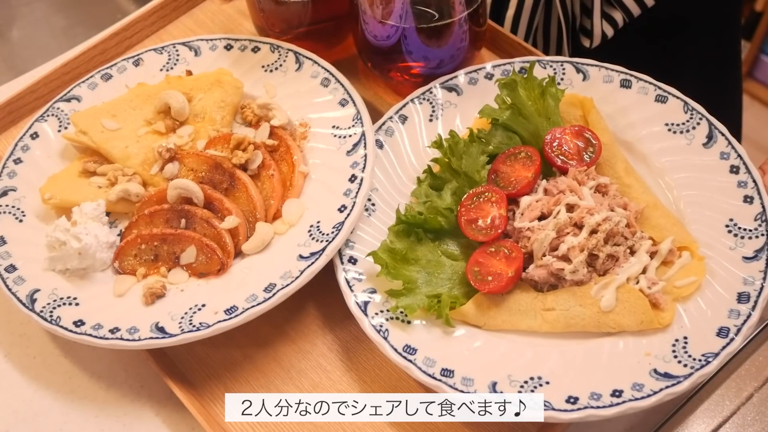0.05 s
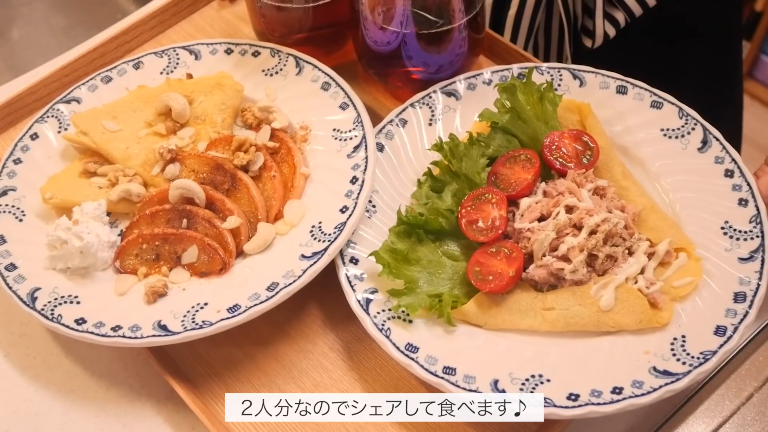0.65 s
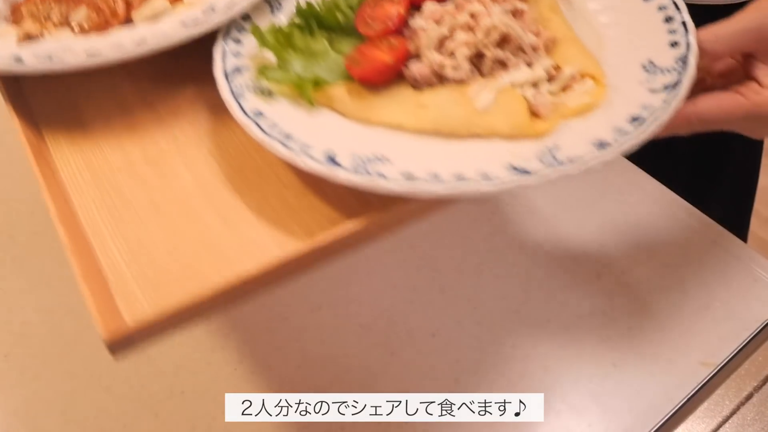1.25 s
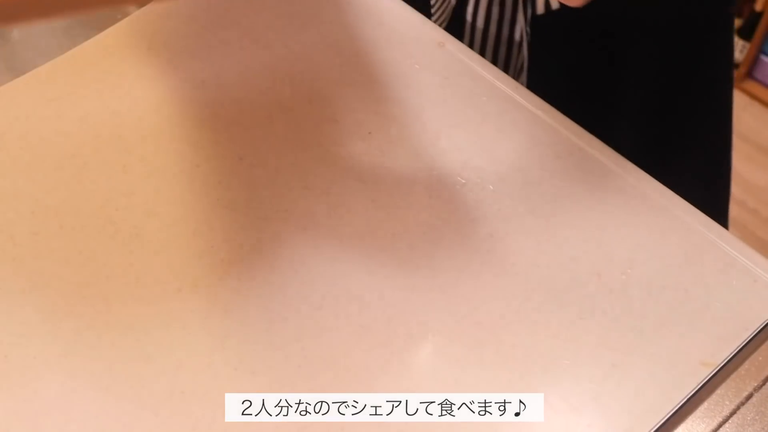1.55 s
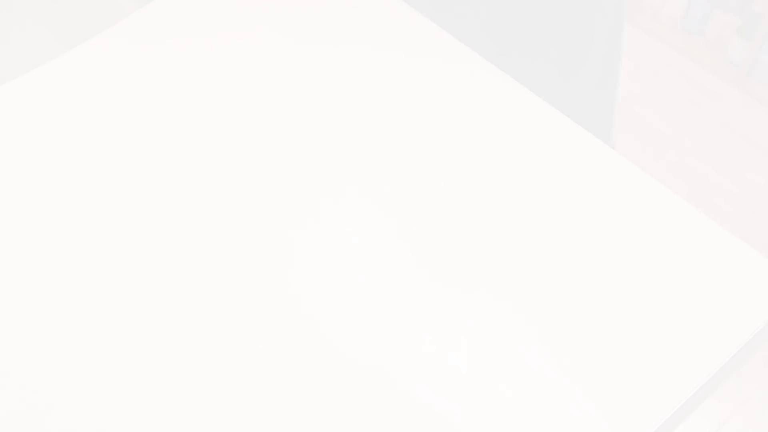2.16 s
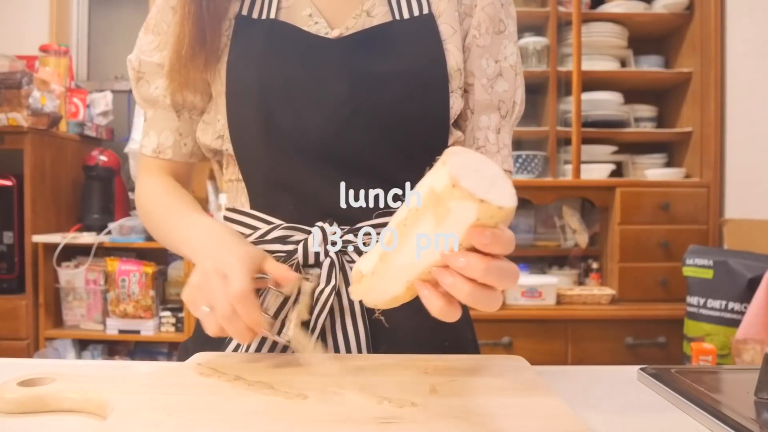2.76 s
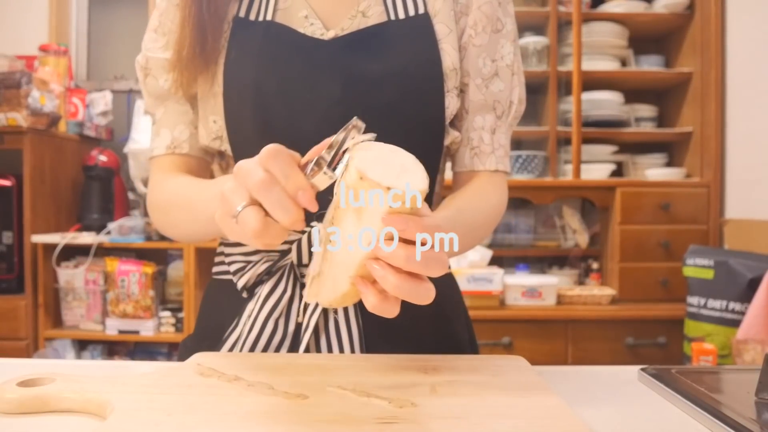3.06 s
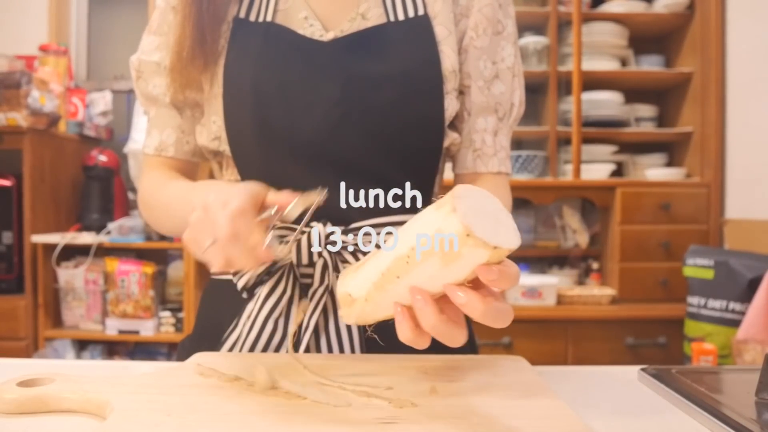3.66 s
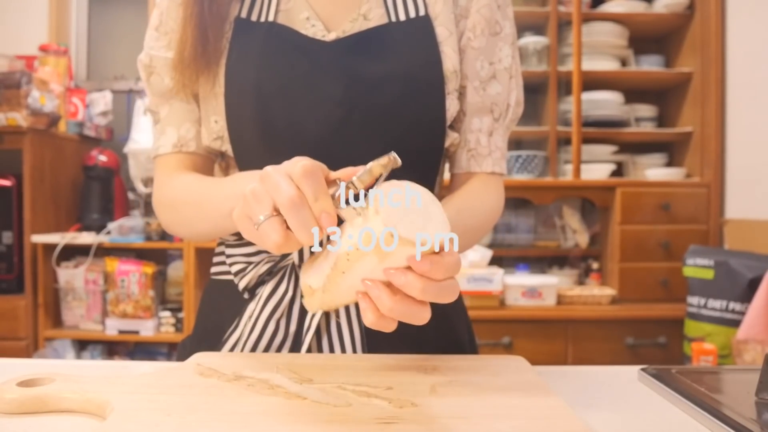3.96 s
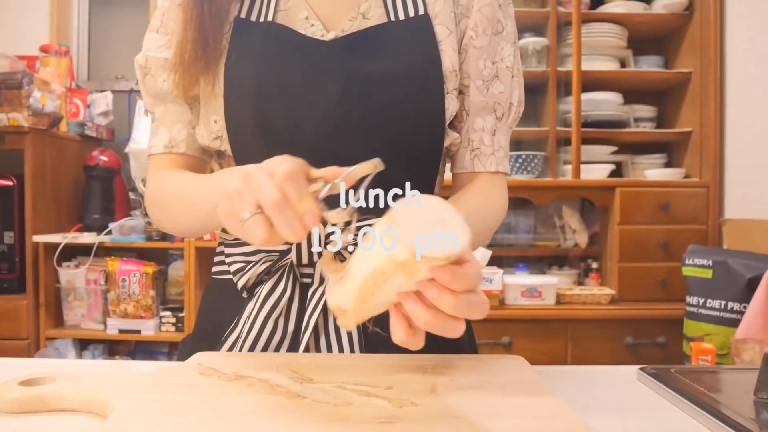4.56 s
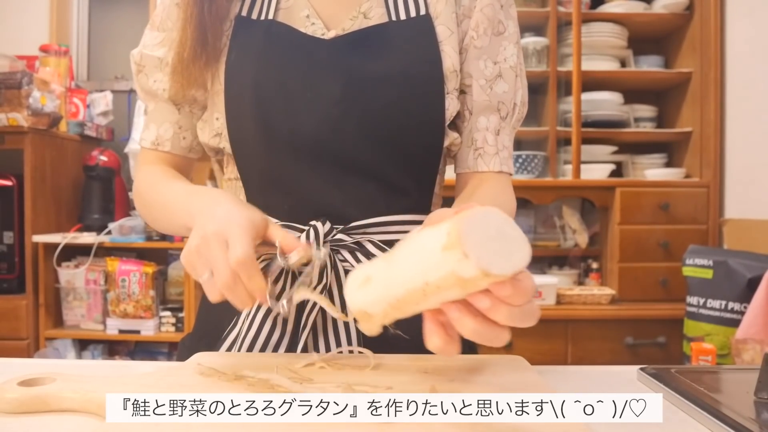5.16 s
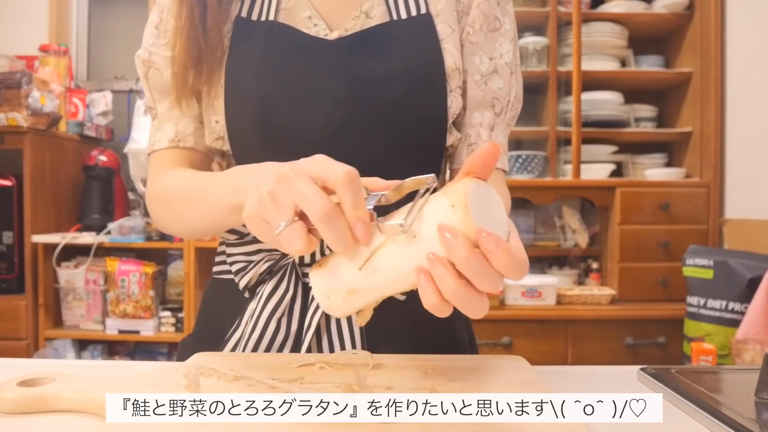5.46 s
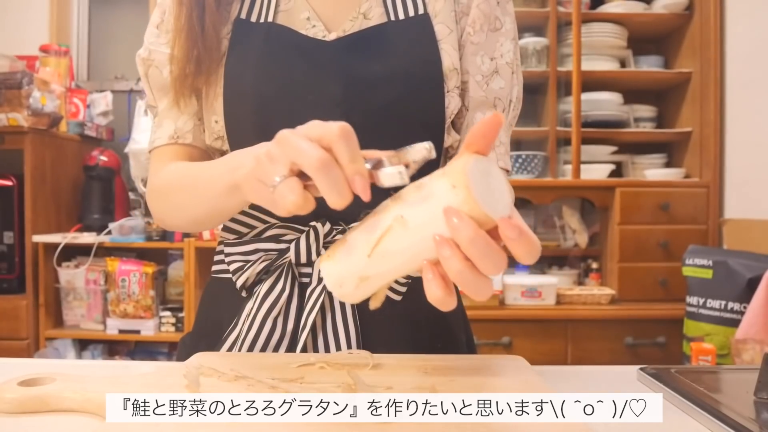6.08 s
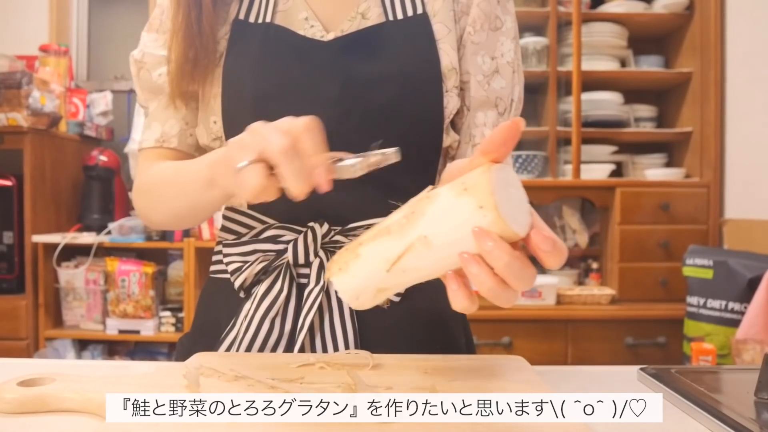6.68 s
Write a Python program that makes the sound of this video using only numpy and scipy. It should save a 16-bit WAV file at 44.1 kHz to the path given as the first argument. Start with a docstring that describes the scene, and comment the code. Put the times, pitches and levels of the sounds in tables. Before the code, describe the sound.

A swivel peeler scrapes a root vegetable six times in a small kitchen, its loose steel blade clinking between the short, moist rasps. Before it starts, there is only a low appliance hum with fan hiss and the faint rustle of a tray being lifted. A sharp double click, very close and louder than everything else, cuts across the first stroke. The hum carries on beneath the peeling to the end.

```python
"""Peeling a yam

A metal swivel peeler makes six quick strokes in a small kitchen with humming appliances. In each, the
blade lands (impact), rasps through skin and wet flesh (fracture), then slips off and rattles against its
stop (free vibration). First a tray is lifted from the worktop with a faint rustle; then the background
hum and hiss change at a scene cut, and the peeling begins. During the first stroke a sharp double click,
like a switch pressed and released, sounds very close."""
import sys
import numpy as np
from scipy import signal
from scipy.fft import rfft, irfft
from scipy.io import wavfile

SR = 44100
rng = np.random.default_rng(int(sys.argv[2]) if len(sys.argv) > 2 else 0)


def store_pcm(level_fs):
    """Save levels as 16-bit WAV."""
    pcm = np.round(np.clip(level_fs, -1, 1) * 32767).astype(np.int16)
    wavfile.write(sys.argv[1], SR, np.atleast_2d(pcm).T)


N = 305172
TIME = np.arange(N) / SR

# Levels are in dB; the click, smacks, blade hits and peeling add a further gain.
# fan noise before and after the scene cut (frequency [Hz], spectral level [dB])
FAN_BEFORE = [(25,-18), (60,-8.5), (140,-10.5), (400,-9), (520,-10), (700,-13), (1200,-17), (2500,-28),
              (5500,-26), (6600,-24), (9000,-29), (12500,-28), (15000,-24.5)]
FAN_AFTER = [(25,-20), (60,-10.5), (170,-6), (330,-5.5), (520,-9), (700,-13), (1200,-16.5), (2500,-27.5),
             (3200,-24), (6400,-24), (9000,-26), (12500,-25), (15000,-21.5)]
# likeness of the fan noise on left and right (frequency [Hz], coherence [0-1])
FAN_COHERENCE = [(50, 0.98), (300, 0.99), (1500, 0.93), (7000, 0.84), (15000, 0.92)]
# motor tones (frequency [Hz], level before [dB], level after [dB], wavering share of power [0-1])
MOTOR_TONES = [(49, -53.5, -56.5, 0.02), (95.9, -55, -72, 0), (99.8, -59, -55, 0.7),
               (198.2, -60, -55.5, 0.77), (204.1, -55, -56.5, 0.35), (241.7, -64.5, -57.5, 0.74),
               (295.4, -60.5, -74, 0.6), (340.3, -76, -66.5, 0.8), (385.7, -61, -62, 0.56),
               (484.8, -54.5, -58, 0.32)]

# the tray is lifted, later a strip of peel drops (time [s], level [dB], rise [s], decay [s])
HANDLING_CONTACTS = [(.65, -55.5, .015, 0.033), (1.4, -53, .04, .05), (2.852, -44, .002, .007)]
# the double click (time [s], level [dB], rise [s], decay [s])
SWITCH_CLICKS = [(2.5302, 1.5, 0.000076, 0.003), (2.6812, -2.5, 0.00036, 0.0037)]
# slimy peel sticks and lets go (time [s], level [dB])
PEEL_SMACKS = [(5.4655, -23.5), (5.871, -31), (5.889, -35), (5.9085, -36), (6.2823, -29), (6.3181, -31),
               (6.408, -15), (6.782, -38), (6.8177, -34)]
# the edge sticks and slips (time [s], level [dB], rise [s], decay [s])
EDGE_SQUEAKS = [(3.138, -38, .003, 0.0073), (3.186, -33.5, 0.0043, .008), (6.465, -35.5, 0.045, .02)]
# the blade skids before it bites (time [s], level [dB], rise [s], decay [s])
BLADE_SKIDS = [(5.53, -33.5, 0.014, .08)]
# the freed blade hits its stop (time [s], level [dB], rise [s])
BLADE_SWINGS = [(2.7501, -11, 0.0041), (2.768, -12.5, 0.0024), (2.921, -19, 0.0022), (2.998, -32, .004),
                (3.5965, -18.5, 0.00043), (3.64, -29.5, 0.002), (4.41, -21, 0.0014), (5.1085, -10, 0.0015),
                (5.1244, -16, 0.0028), (5.177, -23.5, 0.00083), (5.411, -34.5, 0.0015),
                (5.7975, -12, 0.0023), (5.8474, -29, 0.0028), (6.5795, -11.5, .002)]
# the blade lands or snags on the yam (time [s], edge level [dB], knock level [dB], rise [s])
BLADE_LANDINGS = [(2.492, -22.5, -47, .001), (3.1338, -29.5, -62, 0.00076), (3.1917, -11.5, -40.5, .003),
                  (3.2915, -11.5, -42, 0.00021), (3.468, -16, -56, .0006), (3.974, -11.5, -41.5, .0024),
                  (4.0815, -11.5, -40, 0.00039), (4.2355, -7, -36, .0007), (4.734, -33, -56, 0.0067),
                  (4.772, -10.5, -48.5, 0.008), (4.8795, -19.5, -54, 0.007), (5.2935, -18.5, -57, .005),
                  (5.31, -17.5, -65, .008), (5.779, -15, -39, .002), (6.0123, -35, -60, .001),
                  (6.1992, -7.5, -32, 0.0027), (6.246, -24, -49, 0.0019)]
# strokes (touch [s], bite [s], deepest cut [s], exit [s],
# crackle level [dB], rasp level [dB], tearing level [dB], chatter level [dB], tearing pitch [Hz])
PEELING_STROKES = [ (2.49, 2.53, 2.68, 2.767, -32, -59, -54, -53, 1820),
                   (3.215, 3.29, 3.39, 3.511, -32.5, -42, -44.5, -45, 1760),
                   (3.98, 4.11, 4.22, 4.31, -32.5, -43, -45, -51, 1770),
                   (4.79, 4.915, 5.04, 5.124, -34, -44.6, -44.5, -47.5, 1770),
                   (5.495, 5.585, 5.72, 5.775, -32, -48, -52.5, -43.5, 1860),
                   (6.295, 6.36, 6.45, 6.536, -31.5, -44.3, -52, -46.5, 1930), ]
# loss at the shallowest cut (crackle [dB], rasp [dB], tearing [dB], chatter [dB])
SHALLOW_CUT_LOSS = [2.65, 4.8, 13.6, 6.1]

# normal modes (frequency [Hz], level [dB], time to fall 60 dB [s])
HOUSING_MODES = [(104, -25, 0.022), (176, -21.5, 0.049), (537, -18.5, 0.018), (763, -16.5, 0.029),
                 (1054, -19.5, 0.023)]  # hollow body under the double click
BLADE_MODES = [(4600, -20, .05), (5750, -21, .05), (7450, -19, .1), (10050, -20, .09), (11110, -21, .1),
               (12980, -1, .07), (13070, 2, .1), (13640, -9, .045), (13870, -10, .04), (14650, -10, .05),
               (15270, -13, .06), (15600, -12, .07)]  # steel blade

# spectral envelopes (frequency [Hz], spectral level [dB])
RUSTLE_SPECTRUM = [(400, -15), (1100, 0), (1700, -10), (3000, -17), (8000, -28)]  # soft handling
SNAP_SPECTRUM = [(900,-21), (2000,-13), (3000,-5.5), (4760,-6), (5750,-3), (7620,-5.5), (10500,0),
                 (12200,0.5), (13500,-3.5), (16000,-4.5)]  # double click
SMACK_SPECTRUM = [(2000,-27), (4000,-13), (9500,-17), (11800,5), (13000,-4), (15500,-10)]  # bursting slime
FRAME_SPECTRUM = [(2000, -75), (3500, -8), (4700, 5.5), (5200, -1), (5800, 5.5), (6700, -14), (9000, -27)]  # jolted peeler frame
CLINK_SPECTRUM = [(5500, -21.5), (7500, -9.5), (9000, -9), (12300, -3), (13000, 7), (14000, 3), (15700, -7),
                  (17000, -53)]  # blade on its stop
TICK_SPECTRUM = [(2060, -30), (3500, -19), (4540, -13), (5970, -10), (6870, -19.5), (7600, -6), (8800, -15),
                 (9200, -8.5), (12000, -9), (12600, -4), (13400, 1.5), (13700, -1), (16000, -6)]  # edge meeting the yam
KNOCK_SPECTRUM = [(470, -54), (800, -17), (966, -1), (1140, -7), (1280, 9), (1450, -3.5), (1950, -2.5),
                  (2170, 4), (2480, -5), (2720, 7.5), (4000, -12), (5200, -69), (8800, -120)]  # dull part of a landing
SKIN_SPECTRUM = [(4500,-13), (6500,-10), (7750,-2.5), (8400,-7), (10000,-4.5), (12000,-3), (12650,-4),
                 (13100,-4), (13700,3.5), (15100,2), (16000,-23)]  # fine crackle of the skin
RASP_SPECTRUM = [(750,-19), (1100,-9.5), (2300,-10), (2760,-0.5), (3100,-13), (4200,-6), (4900,4), (5640,2),
                 (6600,2.5), (8500,-14), (11000,-26)]  # coarse scraping
CHATTER_SPECTRUM = [(2300,-30), (3000,-8.5), (3400,-1), (3550,-1.5), (3850,-4), (4500,-9.5), (5500,-41)]  # blade vibrating in the cut


def from_db(db):
    """The decibel scale is logarithmic: 20 dB is a tenfold amplitude."""
    return 10 ** (np.asarray(db) / 20)


def rms_one(x):
    """Normalisation to unit mean power."""
    return x / np.sqrt(np.mean(x ** 2) + 1e-20)


def at_hz(points, hz):
    """Interpolation on a logarithmic frequency axis."""
    frequencies, values = np.transpose(points)
    return np.interp(np.log(hz + 1), np.log(frequencies), values)


def drift(rate_hz):
    """Random modulation: straight lines between Gaussian values; rms 1."""
    knots = rng.standard_normal(N // 40)
    return rms_one(np.interp(TIME * rate_hz, np.arange(len(knots)), knots))


def through(x, response):
    """Convolution: a linear system answers each sample with its impulse response."""
    return signal.oaconvolve(x, response)[:N]


def colour(x, spectrum, size=2048):
    """Minimum-phase filtering: a folded cepstrum gives a causal response of unit energy."""
    gain = from_db(at_hz(spectrum, np.fft.rfftfreq(size, 1 / SR)))
    cepstrum = irfft(np.log(gain))
    cepstrum[1:size // 2] *= 2
    cepstrum[size // 2 + 1:] = 0
    response = irfft(np.exp(rfft(cepstrum)))
    return through(x, response / np.linalg.norm(response))


def resonance(force, hz, width_hz):
    """Forced resonance in two stages, with a pitch that may move; about unit energy."""
    carrier = np.exp(2j * np.pi * np.cumsum(hz) / SR)
    r = np.exp(-np.pi * width_hz / SR)
    envelope = signal.lfilter([1], [1, -2 * r, r * r], force / carrier + 1e-18)
    return (carrier * envelope).real * np.sqrt(8 * (1 - r) ** 3)


def grains(per_s, spread_db):
    """Shot noise: tiny impulses of uneven size at random moments; rms 1."""
    out = np.zeros(N)
    at = np.flatnonzero(rng.random(N) < per_s / SR)
    sizes = from_db(spread_db * np.minimum(rng.exponential(1, len(at)), 4))
    out[at] = sizes * rng.choice([-1, 1], len(at))
    return rms_one(out)


def contacts(rows, spread_db):
    """Rough contact: micro-impacts build up and die exponentially; one force per level column."""
    forces = np.zeros((len(rows[0]) - 3, N))
    for time, *levels_db, rise, decay in rows:
        near = np.flatnonzero(np.abs(TIME - time) < .1)
        t = TIME[near] - time
        burst = np.exp(np.where(t < 0, t / rise, -t / decay))
        forces[:, near] += np.outer(from_db(levels_db), burst)
    return [force * grains(14000, spread_db) for force in forces]


def strikes(rows):
    """Impulse approximation: the main impact of each contact lasts one sample."""
    impulses = np.zeros(N)
    for time, db, *_ in rows:
        impulses[round(time * SR)] = from_db(db)
    return impulses


def fan(spectrum, level_db):
    """Partial coherence: steady fan noise, nearly alike on both sides in the bass."""
    hz = np.fft.rfftfreq(N, 1 / SR)
    coherence = at_hz(FAN_COHERENCE, hz)
    mid, side = rfft(rng.standard_normal((2, N))) * from_db(at_hz(spectrum, hz))
    stereo = np.sqrt(1 + coherence) * mid + np.sqrt(1 - coherence) * side * [[1], [-1]]
    return from_db(level_db) * rms_one(irfft(stereo, N))


def hum(after, waver_hz):
    """Quadrature modulation: motor tones waver in amplitude and phase."""
    out = np.zeros(N)
    for hz, before_db, after_db, share in MOTOR_TONES:
        phase = 2 * np.pi * hz * TIME
        steady = np.sqrt(2 * (1 - share)) * np.sin(phase)
        wavering = drift(waver_hz) * np.sin(phase) + drift(waver_hz) * np.cos(phase)
        out += from_db(before_db + after * (after_db - before_db)) * (steady + np.sqrt(share) * wavering)
    return out


def appliances(scene_cut_s, whine_hz, whine_width_hz, whine_db):
    """Superposition: the background hum and hiss change at a scene cut, where a thin whine stops."""
    after = np.clip((TIME - scene_cut_s) / 0.35 + .5, 0, 1)
    whine_band = signal.iirpeak(whine_hz, whine_hz / whine_width_hz, fs=SR)
    whine = rms_one(signal.lfilter(*whine_band, rng.standard_normal(N)))
    early = fan(FAN_BEFORE, level_db=-47) + from_db(whine_db) * whine
    late = fan(FAN_AFTER, level_db=-47)
    sound = np.sqrt(1 - after) * early + np.sqrt(after) * late + hum(after, waver_hz=9)
    swell_db = np.interp(TIME, [0, 0.86], [-1, 0]) + 1.5 * after
    return sound * from_db(swell_db)


def kitchen(x, t60_s, reverb_db, width):
    """Reverberation: dense reflections from worktop and cupboards decay exponentially."""
    t = TIME[:SR // 2]
    tails = rng.standard_normal((2, len(t))) * from_db(-60 * t / t60_s) * (t > .003)
    mid, side = (through(x, tail / np.linalg.norm(tail)) for tail in tails)
    return x + from_db(reverb_db) * (mid + width * side * np.array([[1], [-1]]))


def handling():
    """Friction noise: the lifted tray and a dropped strip of peel give a faint, dull rustle."""
    brush, = contacts(HANDLING_CONTACTS, spread_db=3.5)
    return colour(brush, RUSTLE_SPECTRUM)


def switch(snap_db, thud_db):
    """Near-field snap, different on each side, over the shared thud of the housing's damped modes."""
    snap = np.array([colour(contacts(SWITCH_CLICKS, spread_db=1.5)[0], SNAP_SPECTRUM) for side in "LR"])
    t = TIME[:SR // 8]
    housing = sum((-1) ** k * from_db(db - 60 * t / t60) * np.sin(2 * np.pi * hz * t)
                  for k, (hz, db, t60) in enumerate(HOUSING_MODES))
    thud = through(strikes(SWITCH_CLICKS), housing)
    pan_right, pan_left = from_db([[-1.3], [1.3]]), from_db([[1.1], [-1.1]])
    return from_db(snap_db) * snap * pan_right + from_db(thud_db) * thud * pan_left


def smacks(level_db, rise_s, decay_s):
    """Film rupture: slime bursts with tiny high ticks."""
    film, = contacts([(time, db, rise_s, decay_s) for time, db in PEEL_SMACKS], spread_db=4.5)
    return from_db(level_db) * colour(film, SMACK_SPECTRUM)


def stick_slip(rows, hz, width_hz, spread_db):
    """Stick-slip friction: quick slips of the edge drive one resonance of the blade."""
    slips, = contacts(rows, spread_db)
    return resonance(slips, np.full(N, hz), width_hz)


def blade_ring(force, spread_db=1.5):
    """Modal ringing: each mode's share wavers as the contact point moves; about unit energy."""
    out, energy = np.zeros(N), 0
    for hz, db, t60 in BLADE_MODES:
        r, w = from_db(-60 / (t60 * SR)), 2 * np.pi * hz / SR  # pole radius and angle
        drive = force * from_db(db + spread_db * drift(8.2)) + 1e-18
        out += signal.lfilter([0, np.sin(w)], [1, -2 * r * np.cos(w), r * r], drive)
        energy += from_db(db) ** 2 / (2 * (1 - r * r))
    return out / np.sqrt(energy)


def blows(rows, frame_db):
    """Impact scaling: sudden contacts jolt the frame harder, and light ones rattle longer."""
    time, db, *other_db, rise = np.transpose(rows)
    jolt_db = db + frame_db - 3.5 * np.log2(rise / .001)  # 3.5 dB more per halving of the rise
    decay = 0.0026 * 2 ** (-db / 25)  # doubles with each 25 dB drop
    return np.transpose([time, db, jolt_db, *other_db, rise, decay])


def swings(clink_db, frame_db, ring_db):
    """Free vibration: the blade clinks against its stop, rings and shakes the frame."""
    edge, frame = contacts(blows(BLADE_SWINGS, frame_db), spread_db=3.0)
    clink = from_db(clink_db) * colour(edge, CLINK_SPECTRUM)
    ring = from_db(ring_db) * blade_ring(strikes(BLADE_SWINGS))
    return clink + colour(frame, FRAME_SPECTRUM) + ring


def landings(tick_db, frame_db, knock_db, ring_db):
    """Damped impact on the yam: a broad tick, a jolt of the frame, a dull knock and a little ring."""
    edge, frame, body = contacts(blows(BLADE_LANDINGS, frame_db), spread_db=4.5)
    tick = from_db(tick_db) * colour(edge, TICK_SPECTRUM)
    knock = from_db(knock_db) * colour(body, KNOCK_SPECTRUM)
    ring = from_db(ring_db) * blade_ring(strikes(BLADE_LANDINGS))
    return tick + colour(frame, FRAME_SPECTRUM) + knock + ring


def cutting(touch_s=0.015, sink_s=0.063, graze_db=-10, release_db_per_s=493, sag_hz_per_s=1700):
    """Amplitude envelopes: four sounds follow the cut's depth; the tearing pitch sags past its deepest."""
    envelopes, pitch = np.zeros((4, N)), np.full(N, float(PEELING_STROKES[0][-1]))
    for touches, bites, deepest, leaves, *peaks_db, hz in PEELING_STROKES:
        shallowness = np.interp(TIME, [bites, deepest, leaves], [1, 0, 0.76])
        levels_db = [db - loss_db * shallowness for db, loss_db in zip(peaks_db, SHALLOW_CUT_LOSS)]
        bite_db = np.interp(TIME, [bites - sink_s, bites], [graze_db, 0])
        release_db = release_db_per_s * np.clip(TIME - leaves, 0, 1)
        contact = np.clip((TIME - touches) / touch_s, 0, 1) * from_db(bite_db - release_db)
        envelopes += contact * from_db(levels_db)
        sag_hz = sag_hz_per_s * (np.clip(TIME, deepest, leaves) - deepest)
        pitch = np.where(TIME < touches, pitch, hz - sag_hz)
    return envelopes, pitch


def peeling(skin_db, rasp_db, flesh_db, chatter_db, ring_db, grip_db):
    """Fracture under a wavering grip: fibres snap, flesh tears with a hollow note, the blade chatters."""
    envelopes, pitch = cutting()
    fine, coarse, flesh, judder = envelopes * from_db(grip_db * drift(110))
    snaps = fine * grains(per_s=7000, spread_db=3.0)
    crackle = from_db(skin_db) * colour(snaps, SKIN_SPECTRUM) + from_db(ring_db) * blade_ring(snaps)
    rasp = colour(coarse * grains(per_s=3500, spread_db=4.5), RASP_SPECTRUM)
    tearing = resonance(flesh * grains(per_s=2500, spread_db=2.5), pitch, width_hz=350)
    chatter = colour(judder * grains(per_s=3100, spread_db=4.0), CHATTER_SPECTRUM)
    return crackle + from_db(rasp_db) * rasp + from_db(flesh_db) * tearing + from_db(chatter_db) * chatter


def scene():
    """Superposition: peeler and handling reverberate; the close click and the appliances add directly."""
    peeler = peeling(skin_db=1.33, rasp_db=5.5, flesh_db=4.5, chatter_db=6.5, ring_db=-5, grip_db=1.7)
    peeler += smacks(level_db=-4.5, rise_s=.0004, decay_s=0.0034)
    peeler += landings(tick_db=-5.5, frame_db=-22.5, knock_db=4.5, ring_db=5)
    peeler += swings(clink_db=-6.5, frame_db=-14, ring_db=8.5)
    peeler += stick_slip(EDGE_SQUEAKS, hz=7650, width_hz=460, spread_db=3.0)
    peeler += stick_slip(BLADE_SKIDS, hz=3420, width_hz=900, spread_db=2.5)
    room = kitchen(peeler + handling(), t60_s=0.15, reverb_db=-3.5, width=0.38)
    clicks = switch(snap_db=0, thud_db=-2.5)
    return room + clicks + appliances(scene_cut_s=2.45, whine_hz=7030, whine_width_hz=70, whine_db=-65)


def record(dry, cutoff_hz=15700):
    """Clipping and band limiting: peaks beyond full scale flatten, and the top treble is cut."""
    lowpass = signal.ellip(10, .1, 70, cutoff_hz, fs=SR, output="sos")
    return signal.sosfilt(lowpass, np.clip(dry, -1, 1))


dry = scene()
out = record(dry)
store_pcm(out)
```